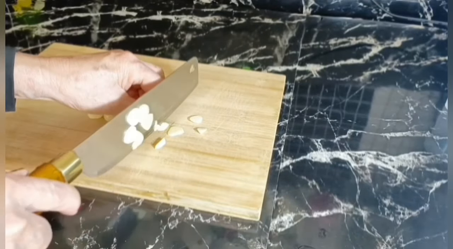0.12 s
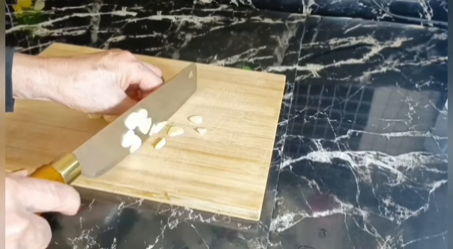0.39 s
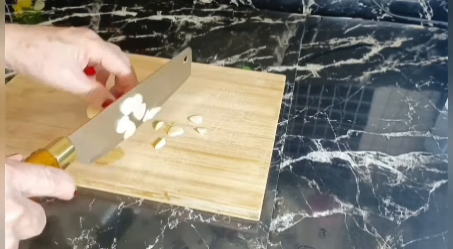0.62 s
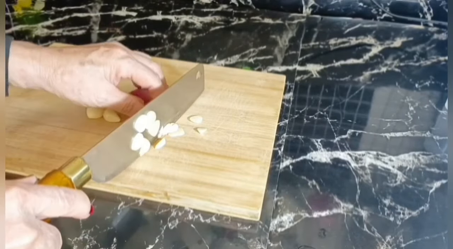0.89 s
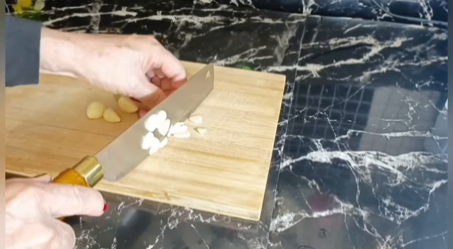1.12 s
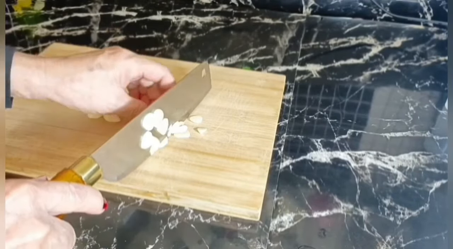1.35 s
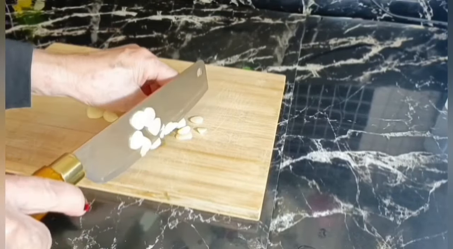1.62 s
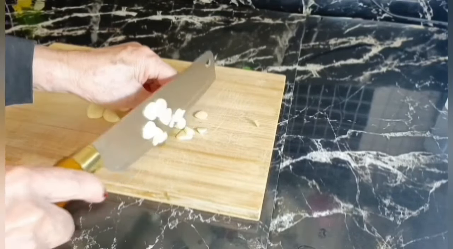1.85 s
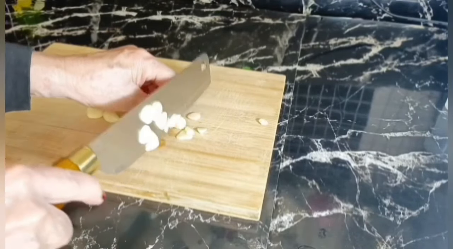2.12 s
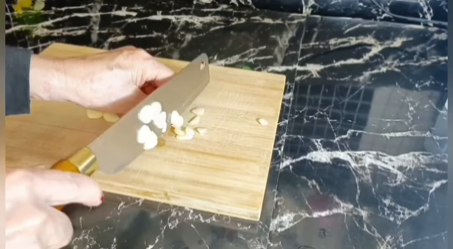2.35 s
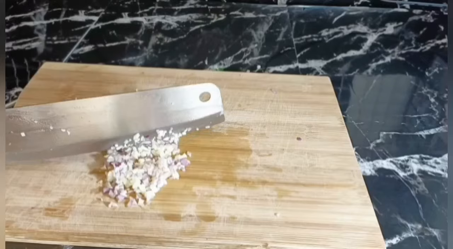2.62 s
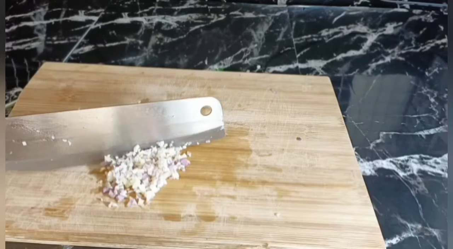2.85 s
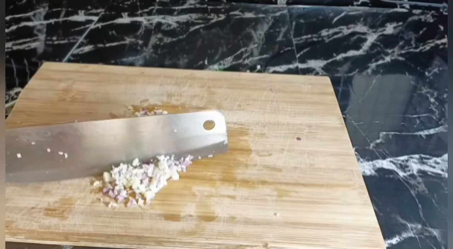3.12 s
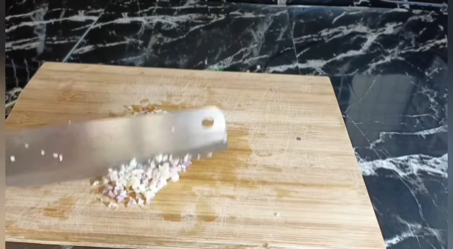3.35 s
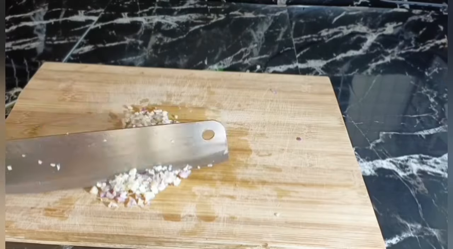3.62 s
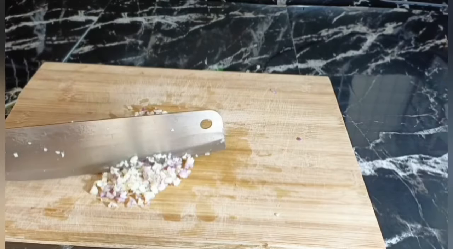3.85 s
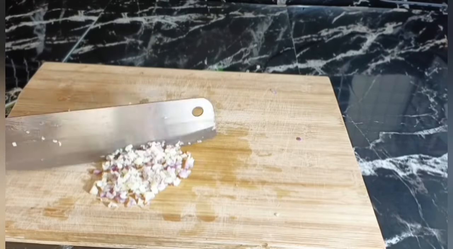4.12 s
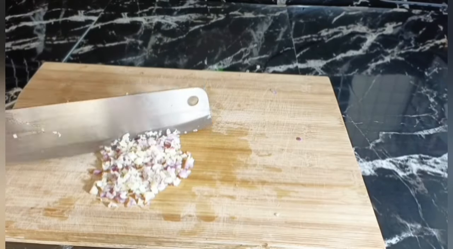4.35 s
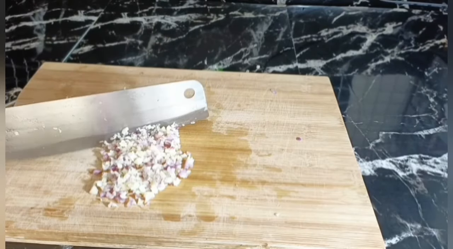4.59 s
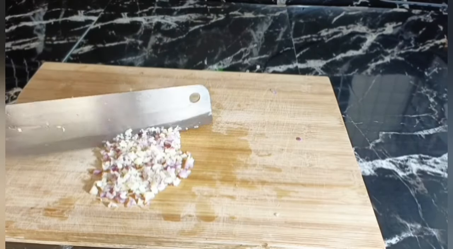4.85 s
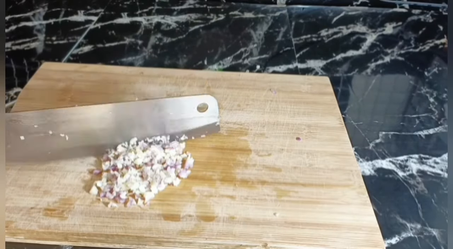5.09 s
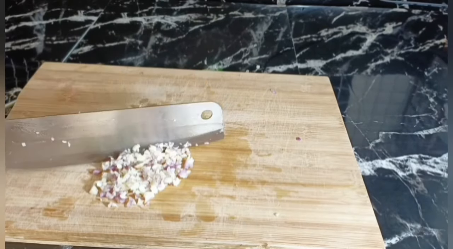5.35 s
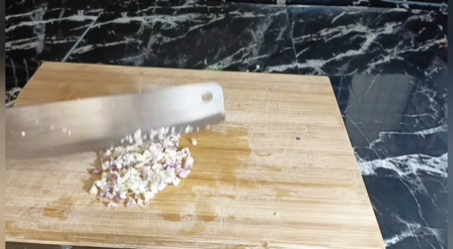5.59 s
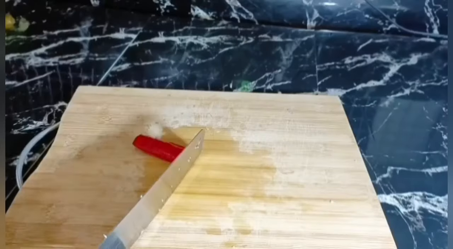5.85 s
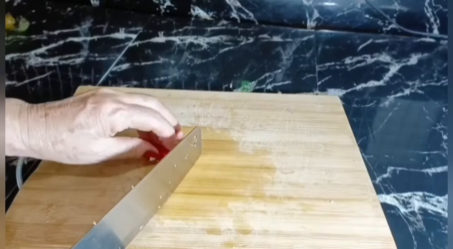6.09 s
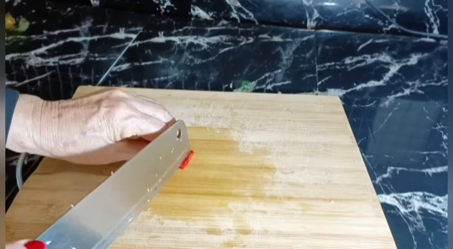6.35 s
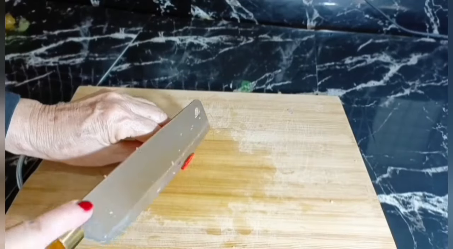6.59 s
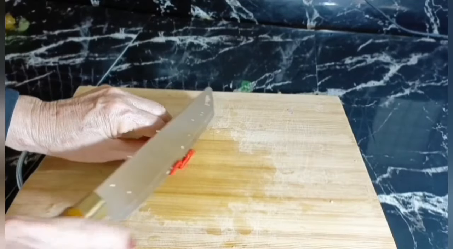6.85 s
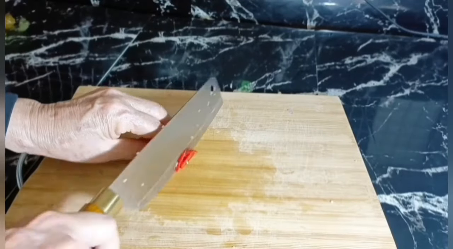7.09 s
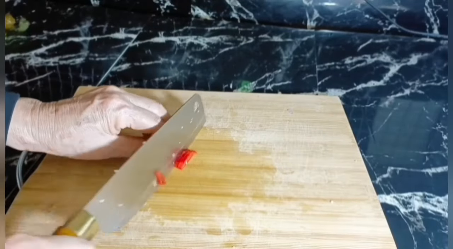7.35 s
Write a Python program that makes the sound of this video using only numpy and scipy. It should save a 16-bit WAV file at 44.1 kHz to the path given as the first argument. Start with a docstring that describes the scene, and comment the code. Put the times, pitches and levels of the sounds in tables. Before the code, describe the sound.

A close stereo microphone hears a cleaver on a wooden board over a stone counter in a small kitchen. From 0 to 2.5 seconds, low rumble, appliance hum and thin wavering tones lie under firm garlic chops: crisp crackling cuts and hollow knocks at about 0.05, 0.27, 0.45 and 0.75, softer handling and weak cuts from 1.0 to 1.75, then hard blows near 2.0, 2.2 and 2.45 with low thumps. It cuts to silence until 3.0. Until 5.55, quieter, cushioned mincing taps come every quarter second, small and crunchy, with stronger ones near 4.1 and 5.3. Silence again until 5.95. Then faint hum, little pepper crunches from 6.25, a grainy sliding hiss around 6.75, and loud snapping knocks at 7.1 and 7.4, with another scrape at the end, 7.5. A short dense room tail follows each blow.

```python
"""An appliance hums in a small kitchen; at once a cleaver starts on a wooden board on a stone counter.
Three shots with silence between: firm slicing chops, light mincing into a soft heap, a slow slice through a pepper.
Crunch is a crackle of bursting cells; knocks and thumps are ringing modes of board and counter; a noise tail is
the room. Rumble, hum and sliding hiss are shaped noise, and the appliance's thin tones are wavering sines."""
import sys
import numpy as np
from scipy import signal
from scipy.fft import rfft, irfft, next_fast_len
from scipy.io import wavfile
from scipy.ndimage import uniform_filter1d

SR = 44100
rng = np.random.default_rng(int(sys.argv[2]) if len(sys.argv) > 2 else 0)


def field_ratio(decibels):
    """Amplitude ratio for a level in dB (20 dB per decade); scalars and array-likes work."""
    return 10 ** (np.asarray(decibels, dtype=float) / 20)


def generate_wav(signal):
    """Clip the signal to [-1, 1] and save it as 16-bit WAV at the path in sys.argv[1]."""
    frames = np.transpose(np.atleast_2d(signal))
    scaled = np.clip(frames, -1, 1) * 32767
    pcm = np.round(scaled).astype(np.int16)
    wavfile.write(sys.argv[1], SR, pcm)


N = 328986   # length in samples
RIGHT_LAG_S = .00018   # the right microphone port hears this much later

# The three shots. Each row: start in seconds, fade-in in ms, end in seconds, steady hiss level in dB,
# treble lift in dB.
SHOTS = [(0, 0.1, 2.541, -67.5, -0.2), (3.019, 50, 5.550, -71.5, 2.5), (5.941, 56, 7.5, -73, 0.3)]
# Mincing strokes into the soft heap. Each row: time in seconds, crunch level in dB, crunch length in ms,
# knock level in dB, counter thump drive in dB.
MINCE = [(3.103, -46.5, 9.8, -47, -35), (3.356, -46.5, 8.9, -51.5, -42.5),
         (3.602, -46.5, 6.3, -45.5, -40.5), (3.854, -49.5, 13.4, -58, -45), (4.087, -40.5, 8.3, -38.5, -32),
         (4.335, -53, 9.2, -52, -46), (4.553, -48.5, 10.6, -52, -41.5), (4.785, -36.5, 5.1, -49.5, -33),
         (5.048, -41.5, 8.2, -43.5, -38.5), (5.334, -36, 5.5, -32, -28.5)]


def rms_one(x):
    """Scale to unit rms."""
    return x / np.sqrt(np.mean(x ** 2) + 1e-20)


def at_hz(points, hz):
    """Read a table of (Hz, value) on a log-frequency axis."""
    table_hz, values = np.transpose(points)
    return np.interp(np.log(hz), np.log(table_hz), values)


def in_time(rows):
    """Join rows of (seconds, values..) by straight lines, one curve per column."""
    s, *columns = np.transpose(rows)
    return [np.interp(np.arange(N) / SR, s, column) for column in columns]


def panned(db):
    """Left and right gains for a left-minus-right level difference."""
    return field_ratio(np.array([[.5], [-.5]]) * db)


def drift(corner_hz):
    """Slow random wander of unit rms: noise through a double pole, worked out every 40 samples."""
    r = np.exp(-2 * np.pi * corner_hz * 40 / SR)
    settling = 2000
    noise = rng.standard_normal(N // 40 + 2 + settling)
    slow = signal.lfilter([1], [1, -2 * r, r * r], noise)[settling:]
    return np.interp(np.arange(N) / 40, np.arange(len(slow)), rms_one(slow))


def bands(size, low_hz, high_hz):
    """Third-octave bands of stereo noise, alike in the bass and nearly unrelated in the treble."""
    # Each row: frequency in Hz, left-right correlation (1 = identical).
    likeness = [(60, 0.98), (150, 0.98), (380, 0.86), (950, 0.24), (2380, 0.05), (5980, 0.04),
                (15000, 0.025)]
    edges = np.geomspace(low_hz, high_hz, round(3 * np.log2(high_hz / low_hz)) + 1)
    white = rng.standard_normal((2, 2, size))   # neighbouring bands take different noise
    for k, (low, high) in enumerate(zip(edges, edges[1:])):
        band_pass = signal.butter(2, [low, high], "band", fs=SR, output="sos")
        mid, side = signal.sosfilt(band_pass, white[k % 2])
        hz = np.sqrt(low * high)
        alike = at_hz(likeness, hz)
        yield hz, np.sqrt(1 + alike) * mid + np.sqrt(1 - alike) * side * [[1], [-1]]


def coloured(spectrum, patchy_db):
    """Stereo noise of a given spectrum whose bands flicker independently; rms 1."""
    top_hz = min(spectrum[-1][0], 16500)
    return rms_one(sum(field_ratio(at_hz(spectrum, hz) + patchy_db * drift(30.0)) * band
                       for hz, band in bands(N, spectrum[0][0], top_hz)))


def background(grain_db=1.0):
    """Rumble and appliance hum as shaped noise, and a hiss that sliding raises and friction makes grainy."""
    # Deep rumble spectrum. Each row: frequency in Hz, relative density in dB per Hz.
    deep_spectrum = [(13, -35), (22, -4), (32, -3), (48, 0.5), (70, -6), (91, -35), (150, -120)]
    # Rumble spectrum. Each row: frequency in Hz, relative density in dB per Hz.
    rumble_spectrum = [(41, -32), (70, -6), (108, 5), (122, 10), (150, -11), (200, -41.5), (330, -120)]
    # Appliance hum spectrum. Each row: frequency in Hz, relative density in dB per Hz.
    hum_spectrum = [(82, -42.5), (140, -19), (193, -8.5), (246, -3.5), (374, -11.5), (452, -12),
                    (490, -11.5), (633, -22), (686, -14), (923, -21.5), (1910, -31), (2370, -26),
                    (3500, -41), (4550, -63), (7700, -120)]
    # Hiss spectrum. Each row: frequency in Hz, relative density in dB per Hz.
    hiss_spectrum = [(880, -25), (1500, -4), (2580, -5), (3120, -5.5), (5870, -8), (7470, -12),
                     (13200, -10), (15900, -10.5), (16500, -65)]
    # Low background. Each row: time in seconds, then deep rumble, rumble and hum levels in dB.
    low_levels = [(0.0, -61, -40.5, -44.5), (0.3, -67, -48, -53.5), (0.65, -55, -50, -55.5),
                  (0.91, -46.5, -46.5, -52), (1.2, -48, -52.5, -54), (1.45, -57, -51, -50.5),
                  (1.63, -42, -48.5, -55), (1.9, -50.5, -43, -53), (2.4, -48.5, -48, -51.5),
                  (3.2, -60, -60, -63), (3.5, -61.5, -68.5, -59), (4.0, -65, -68, -59),
                  (4.25, -60, -66, -59.5), (4.55, -68, -66, -62), (4.8, -57.5, -65.5, -60.5),
                  (5.4, -58, -61, -58), (6.15, -68, -54, -60.5), (6.7, -64, -50.5, -53),
                  (6.95, -59, -51.5, -55), (7.2, -60, -61, -57), (7.46, -49, -48, -49)]
    # Blade and fingers slide on the wood. Each row: time of the peak in seconds, added hiss level in dB,
    # rise and fall in seconds (each to 1/e).
    slides = [(0.99, -56.5, .07, 0.066), (2.25, -60.5, .1, 0.094), (4.28, -74.5, 0.152, 0.17),
              (4.88, -73.5, 0.12, .15), (6.56, -55.5, .1, 0.24), (6.754, -47.5, 0.076, 0.062),
              (7.106, -45.5, 0.031, .12), (7.46, -38, 0.033, .1)]

    t = np.arange(N) / SR
    hiss_level = sum(field_ratio(db) * ((t >= start) & (t < end)) for start, _, end, db, _ in SHOTS)
    for s, db, rise, fall in slides:
        hiss_level = hiss_level + field_ratio(db) * np.exp(-np.abs(t - s) / np.where(t < s, rise, fall))
    hiss = hiss_level * field_ratio(grain_db * drift(70.0)) * coloured(hiss_spectrum, patchy_db=1.5)

    deep_db, rumble_db, hum_db = in_time(low_levels)
    deep = field_ratio(deep_db) * coloured(deep_spectrum, patchy_db=1.5)
    rumble = field_ratio(rumble_db) * coloured(rumble_spectrum, patchy_db=2.5)
    hum = field_ratio(hum_db) * coloured(hum_spectrum, patchy_db=2.5)
    return deep + rumble + hum + hiss


def tones(waver_db=2.0, wander=0.0022):
    """Thin appliance tones: sines that flutter in level and, by a share of their pitch, in frequency."""
    # Each row: frequency in Hz, rms level in dB about which it wavers, start and end in seconds.
    tone_rows = [(239, -57, -0.26, 2.8), (1460, -83.5, -0.8, 2.8), (2400, -75.5, -0.2, 2.8),
                 (3966, -65, -0.35, 2.8), (5160, -85.5, 0, 2.8), (242, -64, 3, 7), (687, -69, 3, 7.2),
                 (2360, -79, 3.5, 5.9), (3940, -82, 2, 5.9), (4010, -75, 2.8, 4.8), (5000, -84, 2.8, 5.9),
                 (6433, -86, 3, 10), (4020, -77.5, 6, 6.9)]
    out, t = np.zeros((2, N)), np.arange(N) / SR
    for hz, db, start, end in tone_rows:
        part = slice(max(round(start * SR), 0), round(end * SR))
        # each melts in and out over 0.3 s
        melt = np.sqrt(np.clip(np.minimum(t[part] - start, end - t[part]) / .3, 0, 1))
        wandering_hz = hz * (1 + wander * drift(12.0)[part])
        phase = 2 * np.pi * np.cumsum(wandering_hz) / SR + rng.normal(0, 0.56, (2, 1))
        phase[1] += 2 * np.pi * hz * RIGHT_LAG_S      # the right leads by as much as its port lags
        level = field_ratio(db + waver_db * drift(20.0)[part])
        out[:, part] += np.sqrt(2) * melt * level * np.sin(phase)
    return out


def crackles():
    """Cuts, bright snaps and mincing strokes as (s, end dB, length ms, swell dB, lead-in ms, L-R dB)."""
    # Slicing cuts and the bright snaps of the blade landing on the board. Each row: start in seconds,
    # crackle level at the end in dB, length in ms, left-minus-right level in dB.
    cuts_and_snaps = [(0.0207, -43, 18, 0), (0.05, -36, 5.6, 2), (.186, -57.5, 21, 3),
                      (0.242, -45, 24.5, 2), (.265, -40, 7.7, 3), (0.433, -47.5, 19, 0),
                      (0.454, -34.5, 5.5, 3.5), (0.737, -51, 2.3, 1), (0.747, -45, 7.8, 6),
                      (0.765, -45, 11.6, 0.5), (1.436, -58, 28, 1), (1.470, -60, 37, -1),
                      (1.761, -44, 67, 3), (1.9816, -34.5, 3.3, 2), (1.999, -39.5, 43, -1),
                      (2.198, -39.5, 18.7, 2), (2.219, -35, 6.9, 1), (2.376, -62, 15, -9),
                      (2.406, -43.5, 37, -1), (2.444, -33, 11, -2), (6.245, -65.5, 12, 3.5),
                      (6.3587, -48.5, 13.4, 6), (6.651, -40.5, 11, 1), (6.674, -36.5, 19, 2),
                      (6.89, -49.5, 12.4, 1.5), (6.931, -55.5, 7.2, 2), (7.045, -68, 28, 6),
                      (7.097, -27.5, 10.3, 2.5), (7.255, -44, 24.5, 1), (7.3315, -51.5, 13, 3),
                      (7.403, -27.5, 7.3, 2.5)]
    even_ms, swell_db_per_doubling = 8.6, 1.5   # shorter ones fade, longer ones swell
    lead_ms, lead_share = .7, .08   # lead-in: a fixed part plus a share of the length
    firm = [(s, db, ms, swell_db_per_doubling * np.log2(ms / even_ms), lead_ms + lead_share * ms, pan_db)
            for s, db, ms, pan_db in cuts_and_snaps]
    soft_swell_db, soft_lead_ms, soft_pan_db = -1.5, 3.15, 1.2
    soft = [(s, db, ms, soft_swell_db, soft_lead_ms, soft_pan_db) for s, db, ms, *_ in MINCE]
    return firm + soft


def crunch(cells_per_s=12000.0, spread_db=3.0, fall_ms=0.99):
    """Dense crackle of bursting cells and landing snaps; each swells or fades along its length, then stops."""
    # Crunch spectrum. Each row: frequency in Hz, relative density in dB per Hz.
    crunch_spectrum = [(530, -35), (900, -0.5), (3780, -1), (5650, -3), (6390, -11.5), (7760, -5),
                       (14800, -6), (15900, -8), (16500, -29)]
    level, t = np.zeros((2, N)), np.arange(N) / SR
    for s, end_db, length_ms, swell_db, lead_ms, pan_db in crackles():
        part = slice(max(round((s - .05) * SR), 0), round((s + .15) * SR))
        since_ms = (t[part] - s) * 1000
        done = since_ms / length_ms      # 0 at the start, 1 at the end
        swell = field_ratio(swell_db * (np.clip(done, 0, 1) - 1))
        lead_in = np.exp(np.minimum(since_ms, 0) / lead_ms)
        stop = np.exp(-np.maximum(done - 1, 0) * length_ms / fall_ms)
        level[:, part] += field_ratio(end_db) * panned(pan_db) * swell * lead_in * stop
    burst_sizes = field_ratio(spread_db * np.minimum(rng.exponential(1, N), 2.8))
    bursts = (rng.random(N) < cells_per_s / SR) * burst_sizes
    grain = np.sqrt(uniform_filter1d(bursts ** 2, size=9) + 1e-9)
    return level * rms_one(grain * coloured(crunch_spectrum, patchy_db=.8))


def blows():
    """All blows as (s, knock dB, thump drive dB, rocking ms, first push dB, contact ms)."""
    # Blade meets board. Each row: time in seconds, knock level in dB, counter thump drive in dB,
    # rocking length in ms, drive of the first push in dB beside the rocking.
    firm_rows = [(.051, -8, -39, 9.13, 11), (.265, -6, -41, 7.92, 8.5), (.453, -4.5, -41, 8.54, 12),
                 (0.726, -25, -34, 38.7, 2), (1.009, -41.5, -39, 21.5, -16), (1.264, -36.5, -59.5, 10, 8),
                 (1.457, -44, -43, 26.5, 10.5), (1.803, -13, -37, 49, -9), (1.98, -27, -31, 11.2, -21),
                 (2.000, -3, -29, 49, -9), (2.216, -4, -41, 8.76, 8.5), (2.445, -4, -37, 12, 9.5),
                 (6.647, -35.5, -35, 19, -17), (6.676, -38.5, -59, 17.5, -7), (6.886, -35, -61, 17, 24),
                 (6.989, -60, -47, 12, -3), (7.095, -26, -31.5, 7, -1), (7.1055, -7, -49.5, 26.8, 17.5),
                 (7.328, -22, -47, 42.7, 3), (7.407, -1, -38, 25.9, 14.5)]
    # contact at a 0 dB knock; weaker blows rest longer on the wood
    contact_ms, contact_ms_per_db = 0.38, 0.0336
    firm = [(*row, contact_ms - contact_ms_per_db * row[1]) for row in firm_rows]
    # the heap cushions the blow
    soft_lag_s, soft_rock_ms, soft_first_db, soft_contact_ms = .0015, 12.14, -2, 1.84
    soft = [(s + soft_lag_s, knock_db, thump_db, soft_rock_ms, soft_first_db, soft_contact_ms)
            for s, _, _, knock_db, thump_db in MINCE]
    return firm + soft


def ring(force, hz, t60):
    """A two-pole resonator: a unit click sets a decaying sine of height 1 ringing."""
    r, w = field_ratio(-60 / (t60 * SR)), 2 * np.pi * hz / SR
    return signal.lfilter([0, np.sin(w)], [1, -2 * r * np.cos(w), r * r], force + 1e-18)


def knocks(count=70, scatter_db=3.0, apart_hz=700.0, crack_db=7.5, dip_db=-14.0, low_hz=260.0, high_hz=2650.0):
    """A blunt push on the board, then many small ones while the edge rocks down; each blow rings every mode anew."""
    # Board modes. Each row: frequency in Hz, width in Hz (wider is driven harder and, above 60 Hz,
    # rings shorter), drive in dB before that width factor.
    board_modes = [(213, 69, -10), (296, 18, -7), (345, 140, -3), (388, 77, -6), (610, 63, -6),
                   (660, 32, -9.5), (818.6, 32, -14.5), (997, 38, -2.5), (956, 51, -1), (1098, 120, -4.5),
                   (1283, 85, -0.5), (1550, 53, -6.5), (1602, 120, -12), (1660, 110, -15),
                   (1800, 35, -19.5), (2420, 62, -16.5), (2540, 250, -22), (2803, 360, -24)]
    out, span = np.zeros((2, N + SR)), SR // 8
    # the board radiates little below its first mode, and the wood damps the treble
    radiate = signal.butter(3, [low_hz, high_hz], "band", fs=SR, output="sos")
    mode_hz = np.array(board_modes)[:, :1, None]
    apart = np.minimum(mode_hz / apart_hz, 1)      # low modes reach both sides alike
    for s, knock_db, _, rock_ms, first_db, contact_ms in blows():
        both = rng.standard_normal((len(board_modes), 1, 1))
        own = rng.standard_normal((len(board_modes), 2, 1))
        strengths = field_ratio(scatter_db * (np.sqrt(1 - apart) * both + np.sqrt(apart) * own))

        late, sizes = rng.random(count), rng.standard_normal((2, count))
        rocking = 0.5 * np.minimum(late / 0.055, 1) * (1 - .5 * late)      # sets in quickly, then eases
        force = np.zeros((2, span))
        force[:, 0] = -field_ratio(first_db)
        for side, size in zip(force, sizes[0] + 1.01 * sizes):      # the sides hear the rocking partly alike
            np.add.at(side, (late * rock_ms * SR / 1000).astype(int), size * rocking)

        through = np.arange(128) / SR * 1000 / contact_ms
        push = np.sin(np.pi * np.minimum(through, 1)) ** 2      # a longer contact is duller
        force = signal.lfilter(push / push.sum(), [1], force)
        body = sum(strength * field_ratio(db) * width / 50 * ring(force, hz, 2.2 / max(width, 60))
                   for (hz, width, db), strength in zip(board_modes, strengths))
        crack = field_ratio(crack_db) * force / np.abs(force).max()
        blow = signal.sosfilt(radiate, body / np.abs(body).max() + crack)
        blow = blow / np.abs(blow.mean(0)).max()
        # the first contact: a short dip of pressure
        blow[:, :len(push)] -= field_ratio(min(first_db, 10) + dip_db) * push
        at = round(s * SR)
        out[:, at:at + span] += field_ratio(knock_db) * blow
    return out[:, :N]


def boom():
    """Each knock sets the lowest air mode of the kitchen ringing through a low-pass push."""
    mode_hz, drive_db, t60_s = 95, -26, 0.53   # the drive is relative to the knock level
    force = np.zeros(N)
    for s, knock_db, *_ in blows():
        force[round(s * SR)] = field_ratio(knock_db + drive_db)
    return ring(signal.lfilter([.01], [1, -.99], force), mode_hz, t60_s)


def thumps(push_hz=116.0, lag_s=.006):
    """The weight of each blow reaches the counter a little later and rings its low modes."""
    # Counter modes. Each row: frequency in Hz, relative level in dB, decay by 60 dB in seconds.
    counter_modes = [(44, -7.5, 0.16), (68, 0, 0.28), (96.5, 3, 0.13), (165, -6, 0.29)]
    force = np.zeros(N)
    for s, _, thump_db, *_ in blows():
        force[round((s + lag_s) * SR)] = -field_ratio(thump_db)
    force = signal.sosfilt(signal.butter(2, push_hz, fs=SR, output="sos"), force + 1e-18)
    return sum(field_ratio(db) * ring(force, hz, t60) for hz, db, t60 in counter_modes)


def kitchen(x, gap_ms=2.2, early_db=3.0, early_ms=9.2):
    """Counter and walls answer with a dense noise tail, strongest early on, that dies band by band."""
    # Each row: frequency in Hz, decay by 60 dB in seconds.
    room_decay = [(60, 0.2), (160, 0.34), (420, .3), (1100, 0.41), (2900, 0.34), (7700, 0.51),
                  (15000, 0.056)]
    t = np.arange(int(.6 * SR)) / SR
    tail = sum(field_ratio(-60 * t / at_hz(room_decay, hz)) * band for hz, band in bands(len(t), 40, 17000))
    onset = np.clip(t * 1000 / gap_ms, 0, 1) ** 2
    early = 1 + field_ratio(early_db) * np.exp(-t * 1000 / early_ms)
    tail = tail * onset * early
    return signal.fftconvolve(x[None], tail / np.sqrt(np.sum(tail ** 2) / 2), axes=1)[:, :N]


def scene():
    """Board, counter and blade; the kitchen answers."""
    board, low, cut = knocks(), thumps(), crunch()
    wet = kitchen(field_ratio(-4.0) * board[0] + field_ratio(-6.5) * cut[0] + field_ratio(-13.0) * low)
    return board + low + cut + wet + boom() + background() + tones()


def roll_off(x):
    """The treble ends steeply here."""
    return signal.sosfilt(signal.butter(12, 16660, fs=SR, output="sos"), x)


def record(dry):
    """Two unlike ports, the right one later; each shot has its own treble, fades in and is cut off sharply."""
    # Microphone ports. Each row: frequency in Hz, left-minus-right level in dB.
    port_balance = [(60, 2), (120, -1), (240, -0.5), (480, -0.5), (950, 0), (1890, 1.5), (3770, -2.5),
                    (7520, 2), (15000, -2)]
    size = next_fast_len(N + SR // 10)
    hz = np.maximum(np.arange(size // 2 + 1) * SR / size, 1)
    lag = np.exp(-2j * np.pi * hz * [[0], [RIGHT_LAG_S]])
    ports = panned(at_hz(port_balance, hz)) * lag
    heard = irfft(rfft(dry, size) * ports, size)[:, :N]
    heard = signal.sosfilt(signal.butter(4, 32.0, "high", fs=SR, output="sos"), heard)
    heard = signal.sosfilt(signal.cheby2(10, 50, 16500, fs=SR, output="sos"), heard)
    heard = heard / (1 + (heard / .95) ** 4) ** .25      # the highest peaks are rounded
    treble = signal.sosfilt(signal.butter(2, 9500.0, "high", fs=SR, output="sos"), heard)

    t = np.arange(N) / SR
    mix = np.zeros((2, N))
    for start, fade_ms, end, _, lift_db in SHOTS:
        fade_in = np.clip((t - start) * 1000 / fade_ms, 0, 1) ** 2
        cut_off = np.clip((end - t) / 0.002595, 0, 1)
        mix += (heard + (field_ratio(lift_db) - 1) * treble) * fade_in * cut_off
    return roll_off(mix)


dry = scene()
out = record(dry)
generate_wav(out)
```